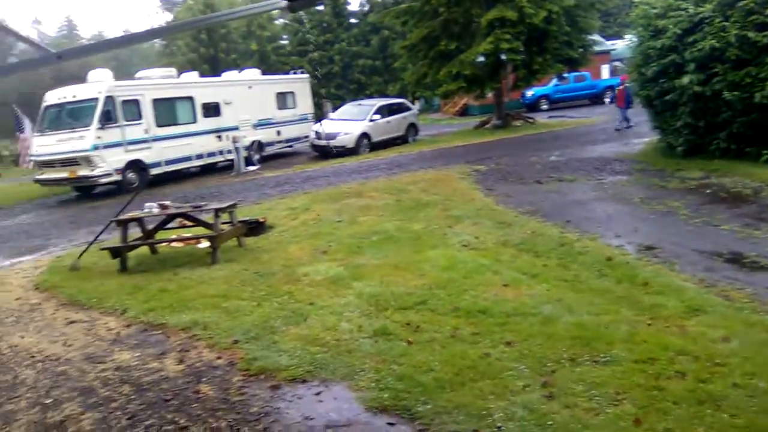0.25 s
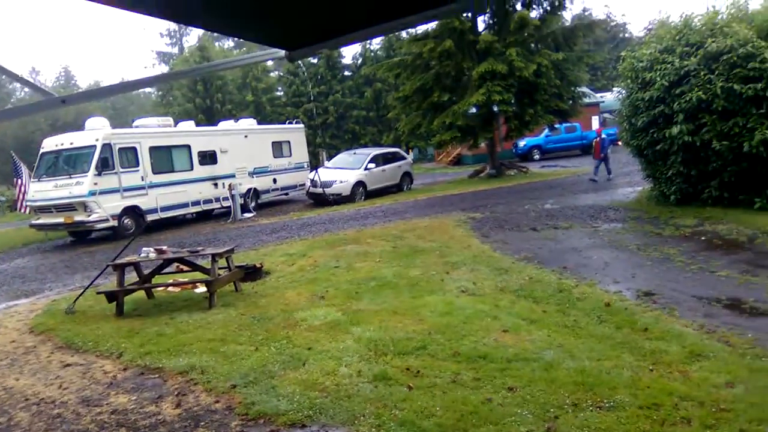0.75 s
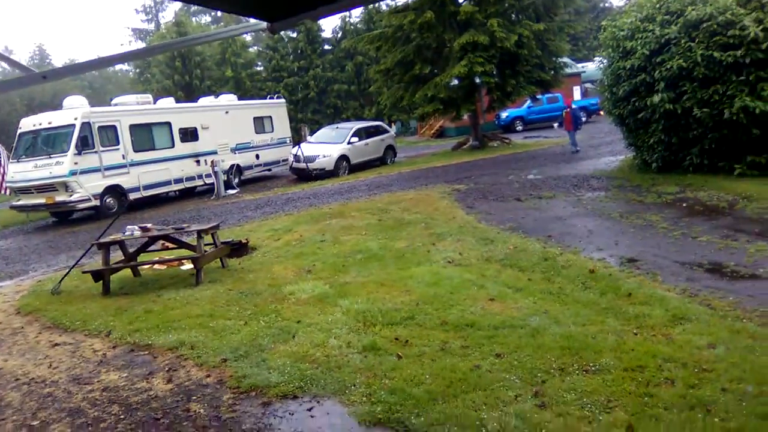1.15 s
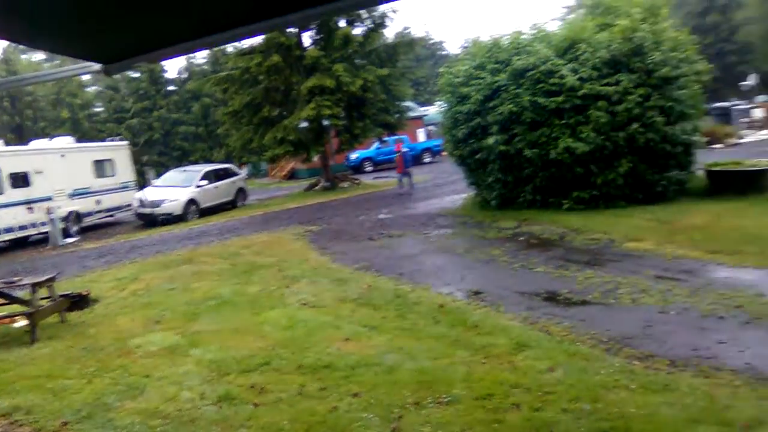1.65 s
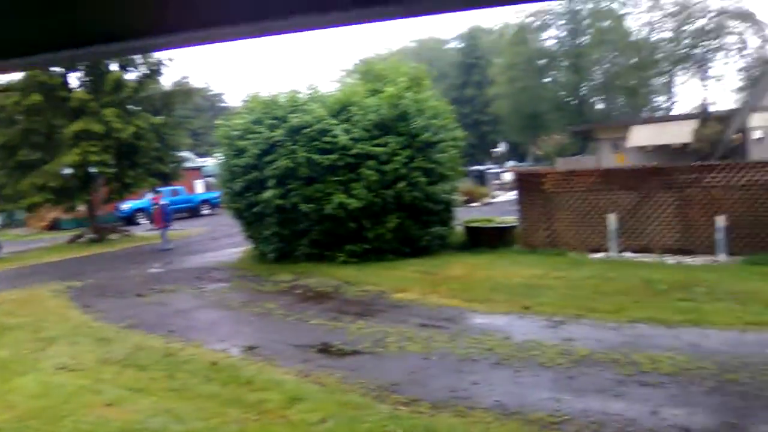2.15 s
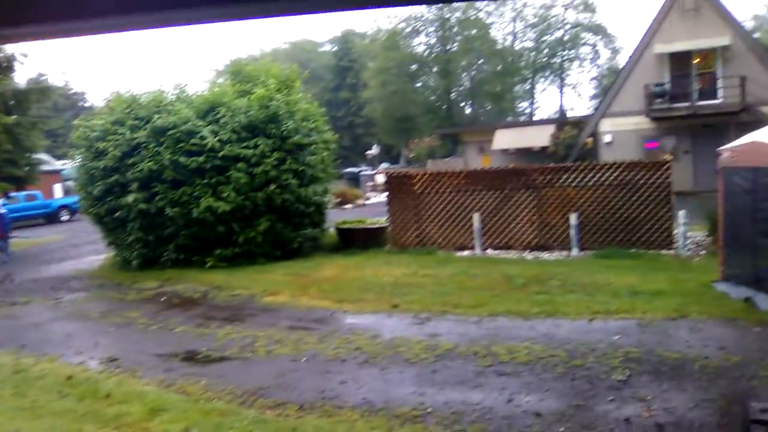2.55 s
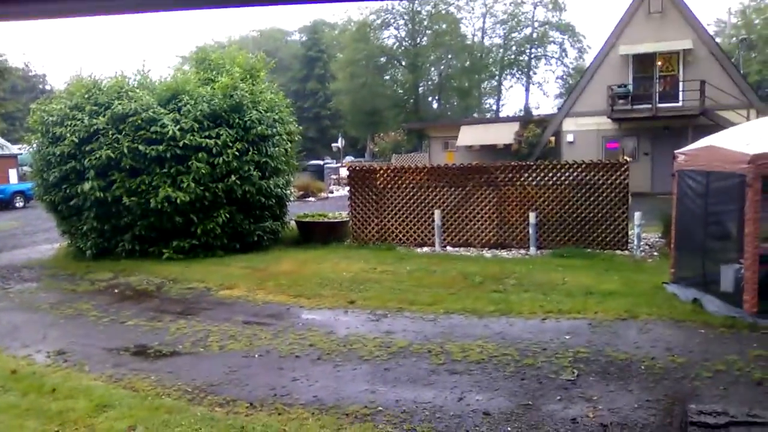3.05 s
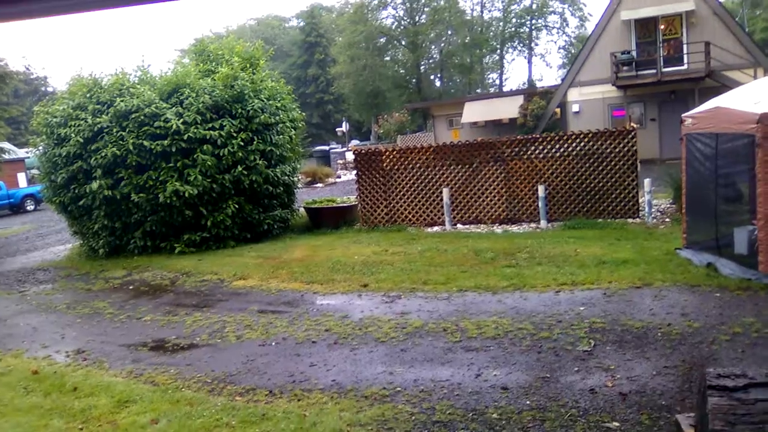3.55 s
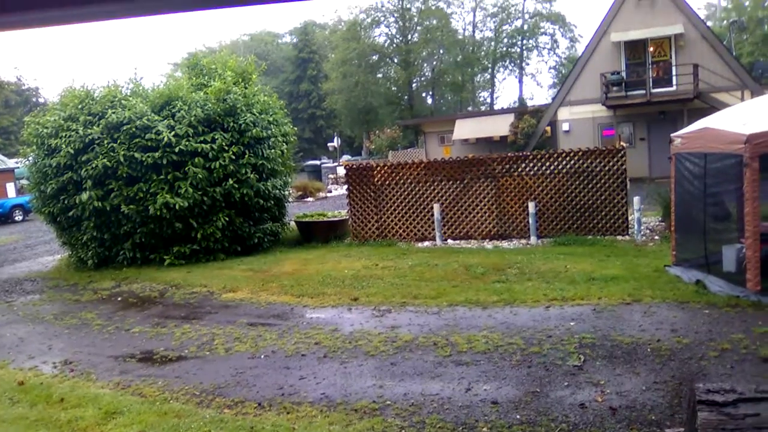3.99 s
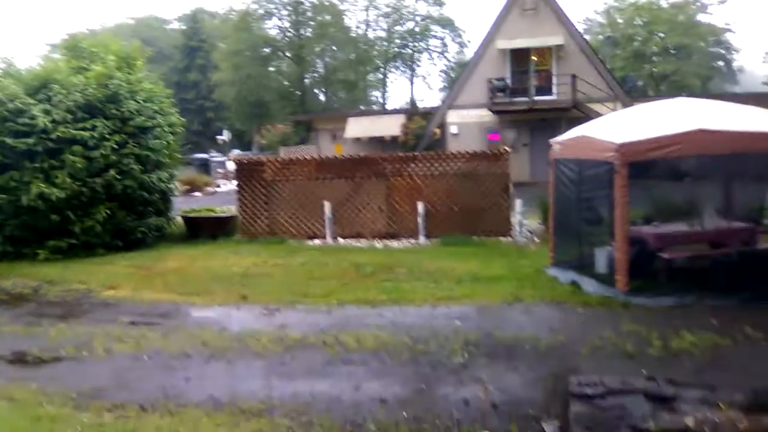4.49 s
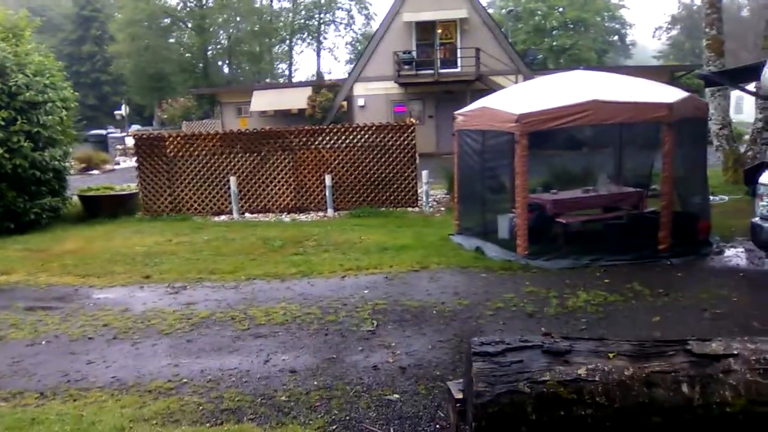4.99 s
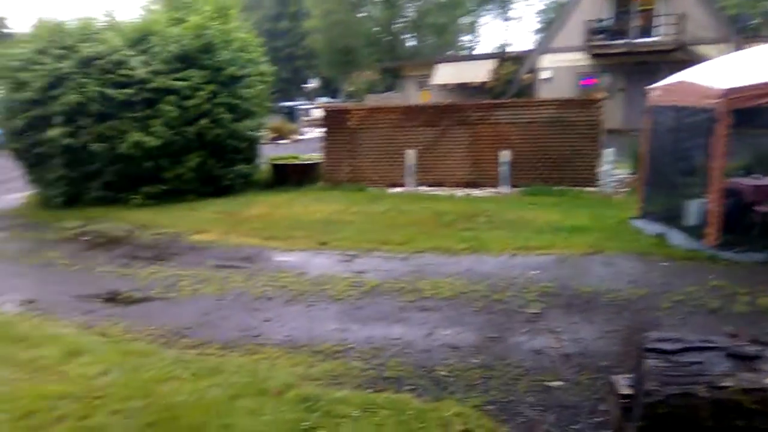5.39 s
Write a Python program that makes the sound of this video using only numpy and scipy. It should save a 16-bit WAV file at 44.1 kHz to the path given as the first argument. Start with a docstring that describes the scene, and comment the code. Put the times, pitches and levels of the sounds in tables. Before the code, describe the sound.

Outdoors under a fabric awning at a campground, fat raindrops land close overhead in irregular hollow pops with a papery rustle after each. Finer droplets tick between them. The patter starts busy, thins around one second, thickens strongly after two, then eases and continues unevenly. A quiet wash of rain lies behind. The microphone sits close beneath the cloth.

```python
"""Rain on a taut awning

Rain patters on a taut fabric awning just overhead at a campground. Each heavy drop is a damped dent
and delayed rebound (pop) plus decaying filtered noise (ripple rustle); small drops tick in between.
Bursts of spray and drips on gravel are grainy decaying noise; ringing notes and one canopy heave are
decaying sines. Light rain on the wet ground beyond is a bed of coloured noise."""
import sys
import numpy as np
from scipy import signal
from scipy.fft import rfft, irfft
from scipy.io import wavfile
from scipy.ndimage import uniform_filter1d

SR = 44100
rng = np.random.default_rng(int(sys.argv[2]) if len(sys.argv) > 2 else 0)


def inscribe(sig):
    """Save sig as 16-bit PCM at rate SR to the path in sys.argv[1].

    A 1-D sig is mono; a 2-D sig holds one channel per row.
    Samples are clipped to [-1, 1] before scaling.
    """
    pcm = np.round(np.clip(np.atleast_2d(sig).T, -1, 1) * 32767)
    wavfile.write(sys.argv[1], SR, pcm.astype(np.int16))


N = 248283
RING = int(.3 * SR)  # length of one short sound, samples
T = np.arange(RING) / SR  # s
HZ = np.maximum(np.fft.rfftfreq(RING, 1 / SR), 1)

# heavy drops on the awning, levels ahead of colouring:
# [t/s, pop energy/dB, ripple re pop/dB, dent f/Hz, contact cutoff f/Hz]
DROPS = [(0.001, -16, 2.5, 496, 8100.0), (0.014, -8.5, -2.5, 312, 10700), (0.0198, -1, -23, 295, 9600),
         (0.046, -14, -5, 503, 9500.0), (0.057, -10, -16, 503, 5900.0), (0.1105, -17.5, -12, 560.0, 5000.0),
         (0.125, -19, -17, 560.0, 2300.0), (0.131, -14, -5, 350, 5000.0), (0.232, -12, 2, 470, 3640),
         (0.256, -9, -42, 500.0, 8040), (0.2653, -10, -2, 505, 3030), (0.327, -6.5, -9, 560.0, 3520),
         (0.338, -5.5, -10, 388, 2280), (0.428, -25, -7, 635, 3300), (0.442, -14, 0.5, 920, 1460),
         (0.482, -9, -12, 543, 2720), (0.502, -16.5, -10.5, 620, 2480), (0.539, -19.5, -11, 835, 1590),
         (0.589, -23.5, -5.5, 436, 2300.0), (0.667, -16, -3.5, 755, 5140), (0.759, -16.5, -12, 570, 2500),
         (0.799, -20, -9, 560, 3500), (0.887, -16, -10, 750, 1920), (0.898, -15.5, -17, 825, 1900.0),
         (0.9263, -6, -14.5, 580, 3580), (0.958, -10.5, -9, 430, 6800), (0.9932, -10, -15, 410, 4900),
         (1.058, -12.5, -3, 480, 4140), (1.099, -15.5, -1, 547, 4900), (1.1133, -11.5, -8, 490, 1900.0),
         (1.209, -7.5, -3, 740, 2680), (1.2146, -19, -0.5, 634, 3020), (1.279, -17, -5.5, 564, 3580),
         (1.3129, -19, -4, 1030, 1380), (1.332, -17.5, -0.5, 517, 2300.0),
         (1.389, -18, -2.5, 1230.0, 1200.0), (1.423, -13, -6.5, 604, 3000), (1.4591, -2.5, -8, 680, 2770),
         (1.5246, -18, -2.5, 750, 2370), (1.684, -10, -13, 756, 9400), (1.717, -13, 0, 554, 3100.0),
         (1.742, -8.5, -11, 594, 6940), (1.7693, -17.5, -3, 1090, 3100.0), (1.801, -15.5, -8, 650, 4300.0),
         (1.844, -19.5, -4, 765, 5940), (1.906, -20, -2.5, 724, 5070), (1.962, -16, -11.5, 1040, 3600),
         (1.972, -18, -4.5, 890, 1800), (2.0357, -21, -11, 400, 1900), (2.05, -8.5, -11, 720, 13000.0),
         (2.0577, -7.5, -8, 745, 8200), (2.1111, -5.5, -5, 590, 8060), (2.171, -3.5, -9.5, 460, 9500.0),
         (2.197, -12.5, -5.5, 550, 13000.0), (2.226, -9.5, -18, 500.0, 5900.0),
         (2.243, -15.5, -21, 700, 6900), (2.2724, 2.5, -17, 370, 3120), (2.312, -12.5, -4, 557, 4300),
         (2.332, -4.5, -5, 655, 2730), (2.345, -2.5, -22, 340.0, 4400), (2.383, -14, -6, 563, 6900.0),
         (2.387, -6.5, -15, 338, 3100.0), (2.3994, -6, -14.5, 440, 8050), (2.448, -9.5, -3.5, 646, 2360),
         (2.5347, -13.5, -6.5, 736, 3120), (2.5467, -10.5, -7.5, 720, 5860), (2.5733, -6, -15, 575, 5900.0),
         (2.579, -6, -9.5, 447, 6900.0), (2.598, -11, -4.5, 560.0, 8100.0), (2.6135, -13.5, -9, 623, 4300),
         (2.628, -8.5, -15, 950.0, 1910), (2.6823, -8.5, -0.5, 800, 3620), (2.7, -0.5, -9, 494, 3670),
         (2.7646, -6.5, -6, 574, 4300.0), (2.8086, -9, -19, 824, 8100.0), (2.885, -17.5, -2.5, 760, 5270),
         (2.9525, -21.5, -2, 720, 8100.0), (2.983, -26.5, 6, 480, 8200), (3.0056, -10.5, -5.5, 920, 3230),
         (3.091, -15, -6, 740, 9500.0), (3.098, -15.5, -8, 1250, 3630), (3.147, -13, -10, 320, 4300.0),
         (3.173, -27, -15, 640, 6900), (3.182, -14.5, -25, 480, 9100), (3.242, -23, -2.5, 700, 5500),
         (3.3099, -15.5, -9.5, 770, 8300), (3.384, -9.5, -12, 231, 3100.0), (3.415, -18, -11, 480, 4000),
         (3.44, -5.5, -14, 230, 5950), (3.4898, -15.5, -5, 497, 3580), (3.517, -7, -9, 516, 13000.0),
         (3.523, -9, -4, 447, 13000.0), (3.558, -10, -22, 500.0, 9500.0),
         (3.593, -15.5, -19, 380.0, 6900.0), (3.613, -17.5, -2, 490, 6860), (3.6814, -12.5, -5, 552, 5130),
         (3.718, -4.5, -18, 388, 2520), (3.8451, -11.5, -4, 540, 13100), (3.878, -15, -6.5, 335, 5500),
         (3.925, -20, 0.5, 437, 13300), (3.989, -9.5, -2, 466, 4300), (4.077, -17, -0.5, 445, 12900),
         (4.1038, -9.5, -9, 550, 3480), (4.1167, -3.5, -32, 340.0, 4100), (4.2048, -4.5, -9, 244, 6200),
         (4.22, -14, -15, 300, 8100.0), (4.2838, -18.5, -6.5, 304, 4330), (4.35, -13.5, -2.5, 490, 5000.0),
         (4.3701, -13, -12, 338, 4300.0), (4.379, -11.5, -7.5, 440.0, 13000.0),
         (4.4314, -20.5, 0.5, 560, 9000), (4.4395, -9.5, -11.5, 258, 8400), (4.569, -20, -4.5, 734, 3100.0),
         (4.611, -19, 1, 447, 1850), (4.6465, -6.5, -9.5, 480, 3330), (4.7054, -13, -10, 445, 3600.0),
         (4.71, -10.5, -4, 388, 6000), (4.8318, -12.5, -8.5, 904, 2660), (4.9252, -11, -15, 770, 1580),
         (4.977, -24.5, -1, 910, 3300), (5.041, -4, -11, 390, 2460), (5.0524, -16, -8.5, 338, 1190),
         (5.0955, -7.5, -6, 845, 9100), (5.126, -18, -14, 650, 8000), (5.152, -15.5, -11, 497, 8100.0),
         (5.205, -5, -8, 352, 4200), (5.2555, -23, -12, 800, 4300), (5.2668, -10.5, -2.5, 915, 1190),
         (5.33, -3, -11.5, 298, 9500.0), (5.3427, -5, -10, 505, 9500.0), (5.4361, -6.5, -10.5, 520, 6650),
         (5.4776, -12.5, -11, 465, 4300.0), (5.5263, -15.5, -14, 1090, 2330), (5.5442, -7, -1, 383, 1200.0),
         (5.557, -12, -3.5, 305, 5060), (5.5849, -11.5, -13, 564, 4400)]


def undb(db):
    """Decibels to gain."""
    return 10 ** (np.asarray(db) / 20)


def unit(x):
    """Scale each row to an energy of one."""
    return x / np.sqrt(np.sum(x ** 2, axis=-1, keepdims=True))


def fade(t60_s):
    """Exponential decay that loses 60 dB in t60_s."""
    return np.exp(-np.log(1000) * T / t60_s)


def lookup(points, hz):
    """Interpolate (Hz, value) points on a log-frequency axis."""
    f, value = np.transpose(points)
    return np.interp(np.log(hz), np.log(f), value)


def colour(x, points):
    """Minimum-phase filter with the given (Hz, dB) shape, so attacks stay sharp."""
    cepstrum = irfft(np.log(undb(lookup(points, HZ))), RING)
    # fold the cepstrum to make the response causal
    cepstrum[1:RING // 2] *= 2
    cepstrum[RING // 2 + 1:] = 0
    impulse = irfft(np.exp(rfft(cepstrum)), RING)
    return signal.fftconvolve(x, impulse)[:len(x)]


def place(times_s, sounds):
    """Add one short sound at each time."""
    out = np.zeros(N + RING)
    for t_s, sound in zip(times_s, sounds):
        i = int(np.clip(t_s * SR, 0, N - 1))
        out[i:i + len(sound)] += sound
    return out[:N]


def shower():
    """Rain intensity, -1 to 1: a running mean of the heavy drops' gains, soft-limited."""
    t_s, drop_db = np.transpose(DROPS)[:2]
    impulses = np.bincount((t_s * SR).astype(int), undb(drop_db), N)[:N]
    mean = uniform_filter1d(impulses, size=9000, mode="wrap")
    mean = uniform_filter1d(mean, size=4000)
    return np.tanh(mean / mean.mean() - 1)


def wash(rms_db, grain_db, swell_db):
    """Countless far drops on grass, gravel and trees merge into a bed that follows the shower."""
    # filter shape of the distant rain: [f/Hz, level/dB]
    wash_shape = [(25, -13), (55, 2.5), (130, -1), (250, 4.5), (1100, -3.5), (3000, -10), (5500, -23),
                  (8000, -28), (14000, -28.5)]
    grains = undb(grain_db * np.minimum(rng.exponential(size=N), 6))
    bed = colour(rng.standard_normal(N) * grains, wash_shape)
    steady = unit(bed) * np.sqrt(N) * undb(rms_db)
    return steady * undb(swell_db * shower())


def spot_tone(count, depth_db):
    """Each spot of cloth has six resonances or dips that make its taps hollow in their own way."""
    chance = rng.random((count, 6, 2))
    tone = 1
    for k in range(6):
        centre_hz = 440 * 1.5 ** (k + chance[:, k, :1])
        q = 9 * (centre_hz / 1000) ** .3
        s = 1j * HZ / centre_hz
        gain = undb(depth_db * (chance[:, k, 1:] - .35))
        tone = tone * (1 + s * gain / q + s * s) / (1 + s / q + s * s)
    return tone


def pop(dent_hz, contact_hz, q, rebound, rebound_s):
    """The cloth dips, then springs back about a millisecond later; soft contact rounds the edge."""
    count, jw = len(dent_hz), 1j * HZ
    s = jw / dent_hz[:, None]
    resonance = s / (1 + s / q + s * s)
    bass_cut = s / (s + 0.3)  # a small dent radiates little bass
    contact = 1 / (1 + jw / contact_hz[:, None]) ** 2
    delay_s = rebound_s * np.exp(0.234 * rng.standard_normal((count, 1)))
    spring = 1 - rebound * np.exp(-2 * np.pi * jw * delay_s)
    spectrum = resonance * bass_cut * contact * spring * spot_tone(count, depth_db=19)
    return -unit(irfft(spectrum, RING))


def ripple(count, grain_db, early_db, return_s):
    """Waves return from hems and frame by many paths: a slight early lull, then a diffuse tail."""
    # decay time of ripples by band: [f/Hz, t60/s]
    ripple_t60 = [(150, 0.14), (600, 0.19), (2500, 0.11), (10000, 0.22)]
    chance = rng.standard_normal((count, 2, RING))
    # noise level steps every 64 samples
    lumps = np.repeat(chance[:, 1, :RING // 64 + 1], 64, axis=1)[:, :RING]
    paths = rfft(chance[:, 0] * undb(grain_db * lumps))
    centres = np.log([hz for hz, _ in ripple_t60])
    tail = 0
    for share, (_, t60_s) in zip(np.eye(len(centres)), ripple_t60):
        band = np.interp(np.log(HZ), centres, share)
        tail = tail + irfft(paths * band, RING) * fade(t60_s)
    onset = np.minimum(undb(early_db) + (T / return_s) ** 4, 1)
    return unit(tail * onset)


def wet_slap(count, above_hz, t60_s):
    """Water spreads for a few milliseconds: tap treble is part clean click, part tiny noise splat."""
    envelope = fade(t60_s) * (1 - fade(t60_s)) ** .5
    splat = rfft(unit(rng.standard_normal((count, RING)) * envelope))
    wetness = rng.uniform(.4, 1, (count, 1))
    s = 1j * HZ / above_hz
    treble = np.sqrt(1 - wetness) + np.sqrt(wetness) * splat
    return (1 + 0.6 * s + s * s * treble) / (1 + np.sqrt(2) * s + s * s)


def awning(times_s, pop_db, pops, ripple_db):
    """Each pop gets a wet slap and drives ripples that ring in the cloth around its spot."""
    # filter shapes of the pops and of the ripples: [f/Hz, level/dB]
    pop_colour = [(40, -0.5), (110, 0.5), (200, 1), (330, -2.5), (650, -5), (1300, -4.5), (2600, -3),
                  (4600, -6), (8000, -4), (14000, -10.5)]
    ripple_colour = [(40, -10.5), (110, 6), (190, 11.5), (500, -1), (1300, -1), (3000, 3.5), (6000, 2),
                     (8000, 1.5)]
    count = len(times_s)
    paths = rfft(ripple(count, grain_db=5.5, early_db=-2.5, return_s=0.013))
    paths = paths * spot_tone(count, depth_db=13)
    dents = rfft(pops)
    taps = unit(irfft(dents * wet_slap(count, above_hz=2380, t60_s=0.01), RING))
    taps = taps * undb(pop_db)[:, None]
    tails = unit(irfft(dents * paths, RING)) * undb(pop_db + ripple_db)[:, None]
    return colour(place(times_s, taps), pop_colour) + colour(place(times_s, tails), ripple_colour)


def heavy_drops():
    """Fat drops land close overhead, each on a stretch of cloth with its own tension (dent pitch)."""
    t_s, pop_db, ripple_db, dent_hz, contact_hz = np.transpose(DROPS)
    pops = pop(dent_hz, contact_hz, q=0.68, rebound=0.5, rebound_s=0.001209)
    return awning(t_s, pop_db, pops, ripple_db)


def small_drops(count, follow_db, spread_db, dent_hz, contact_hz, lone_db, scatter_s):
    """Fine droplets patter down in the wake of heavy drops, edges tied to theirs; a few fall alone."""
    when, which, kind = rng.random((count, 3)).T
    size, pitch, edge = np.clip(rng.standard_normal((count, 3)).T, -1.7, 1.7)
    parents = np.array(DROPS)[(which * len(DROPS)).astype(int)]
    parent_s, parent_db, _, _, parent_hz = parents.T
    follows = kind < .75
    times_s = np.where(follows, parent_s + scatter_s * when ** 1.2, when * N / SR)
    wake_db = follow_db + 1.01 * parent_db - 8 * when  # later droplets are weaker
    level_db = np.where(follows, wake_db, lone_db) + spread_db * size
    edge_hz = np.sqrt(parent_hz * contact_hz) * np.exp(0.32 * edge)
    pitch_hz = dent_hz * np.exp(.45 * pitch)
    pops = pop(pitch_hz, edge_hz, q=1.0, rebound=0.28, rebound_s=0.000715)
    return awning(times_s, level_db, pops, -18)


def spray(bursts, tone, gain_db, t60_s, grain_db):
    """Thrown droplets crackle and thin out: decaying noise whose level steps every 30 samples."""
    t_s, burst_db = np.transpose(bursts)
    steps = np.minimum(rng.exponential(size=(len(t_s), RING // 30 + 1)), 4)
    sizes = np.repeat(undb(grain_db * steps), 30, axis=1)[:, :RING]
    droplets = rng.standard_normal((len(t_s), RING)) * sizes
    sounds = unit(droplets * fade(t60_s)) * undb(burst_db + gain_db)[:, None]
    return colour(place(t_s, sounds), tone)


def splashes():
    """Some drops burst into spray, a long-decaying crackle."""
    # bursting drops: [t/s, relative level/dB]
    burst_drops = [(0.0209, -36), (0.259, -35.5), (1.684, -44.5), (2.0507, -39.5), (2.1703, -38),
                   (2.5753, -42), (2.8073, -35), (3.087, -42.5), (3.517, -34), (4.1135, -37.5),
                   (4.709, -40.5), (5.098, -36.5), (5.329, -32.5), (5.5572, -38)]
    # filter shape of the spray: [f/Hz, level/dB]
    spray_shape = [(200, 3.5), (1200, 10), (3500, 1), (6000, -12.5), (9000, -12), (14000, -33)]
    return spray(burst_drops, spray_shape, gain_db=21.5, t60_s=0.45, grain_db=4.0)


def pings(t60_s, rise_s, bend, bend_s, rough):
    """Drops leave brief, slightly blurred notes that slide up into their pitch and ring on."""
    # ringing notes: [t/s, nominal peak level/dB, settled f/Hz]
    notes = [(0.021, -37.5, 3950), (.455, -38, 1120), (0.588, -40.5, 630), (1.312, -41, 1140),
             (1.369, -47, 2710), (1.423, -42.5, 2990), (2.052, -42, 4120), (2.81, -42, 3360),
             (3.098, -39.5, 1025), (3.147, -41, 518), (3.183, -49.5, 4130), (5.19, -35.5, 915)]
    turns_s = T - bend * bend_s * (1 - np.exp(-T / bend_s))  # time warp of the upward slide
    noise = uniform_filter1d(rng.standard_normal((len(notes), RING)), size=110)
    flutter = 1 + rough * np.sqrt(RING) * unit(noise)
    envelope = fade(t60_s) * np.minimum(T / rise_s, 1)
    sounds = [undb(db) * np.sin(2 * np.pi * hz * turns_s) * envelope for _, db, hz in notes]
    return place([t_s for t_s, _, _ in notes], flutter * sounds / np.hypot(1, rough))


def gravel_drips():
    """Drips spatter on the wet gravel: short crackles in a narrow treble band."""
    # drips: [t/s, relative level/dB]
    drip_hits = [(0.669, -25), (0.797, -29), (0.838, -26), (4.646, -12), (4.85, -28), (4.972, -28)]
    # filter shape of the spatter: [f/Hz, level/dB]
    gravel_shape = [(2000, -28), (4400, -3.5), (5800, -3), (7500, -30)]
    return spray(drip_hits, gravel_shape, gain_db=-3, t60_s=0.083, grain_db=6.0)


def heaves(t60_s, rise_s):
    """The whole canopy swells and settles once with a faint low thud, a decaying sine."""
    start_s, level_db, pitch_hz = 3.809, -43, 68.6  # level ahead of the envelope
    envelope = fade(t60_s) * np.minimum(T / rise_s, 1)
    return place([start_s], [undb(level_db) * np.sin(2 * np.pi * pitch_hz * T) * envelope])


def widen(x, side_db):
    """Only the treble differs between left and right: its direction scatters from moment to moment."""
    treble = signal.butter(10, 5300, "high", fs=SR, output="sos")
    scatter = unit(uniform_filter1d(rng.standard_normal(N), size=20)) * np.sqrt(N)
    scattered = signal.sosfilt(treble, x) * scatter
    side = undb(side_db) * signal.sosfilt(treble, scattered)
    return np.array([x + side, x - side])


def scene():
    """Taps on the awning close above, splashes around it, and the far wash of rain."""
    bed = wash(rms_db=-60.5, grain_db=4.5, swell_db=7.0)
    near = heavy_drops()
    near = near + small_drops(count=540, follow_db=-15, spread_db=3, dent_hz=677, contact_hz=3850,
                              lone_db=-28.5, scatter_s=.05)
    water = splashes() + gravel_drips()
    ringing = pings(t60_s=0.076, rise_s=0.00014, bend=0.15, bend_s=0.0012, rough=0.34)
    thud = heaves(t60_s=0.17, rise_s=0.013)
    return widen(near + water + ringing + bed + thud, side_db=-9)


def record(dry):
    """The recorder cuts the top: a steep elliptic low-pass."""
    top_hz = 14300
    return signal.sosfilt(signal.ellip(8, .2, 70, top_hz, fs=SR, output="sos"), dry)


dry = scene()
out = record(dry)
inscribe(out)
```